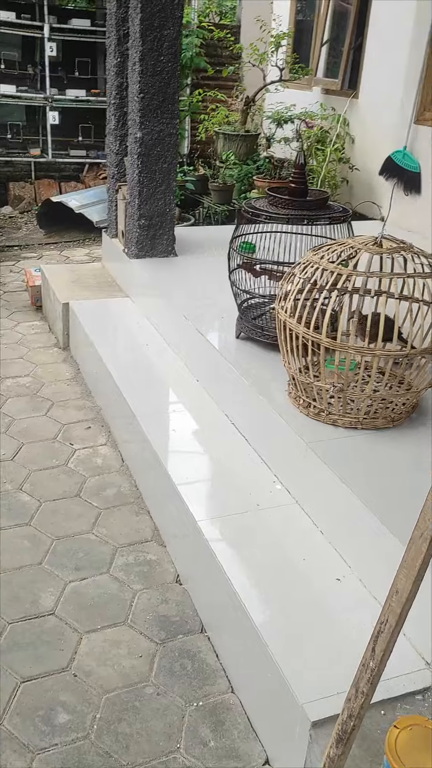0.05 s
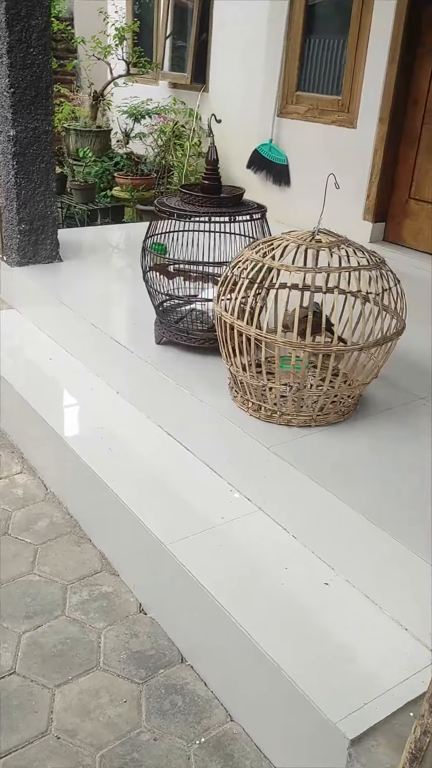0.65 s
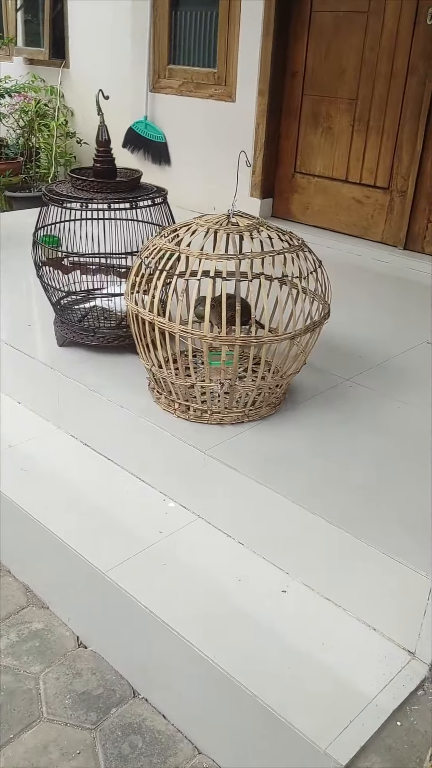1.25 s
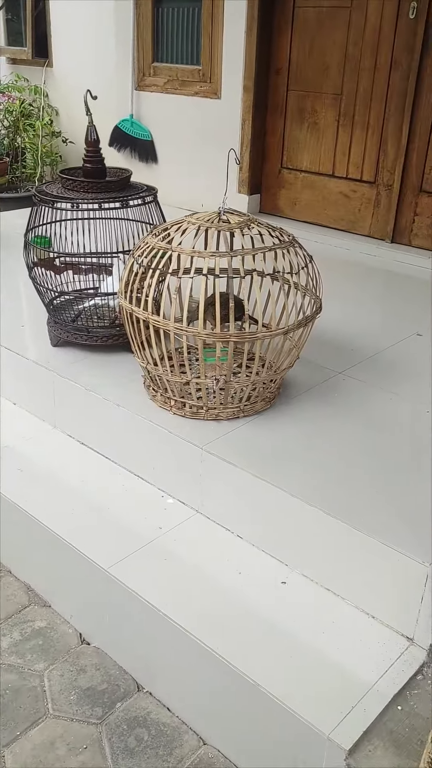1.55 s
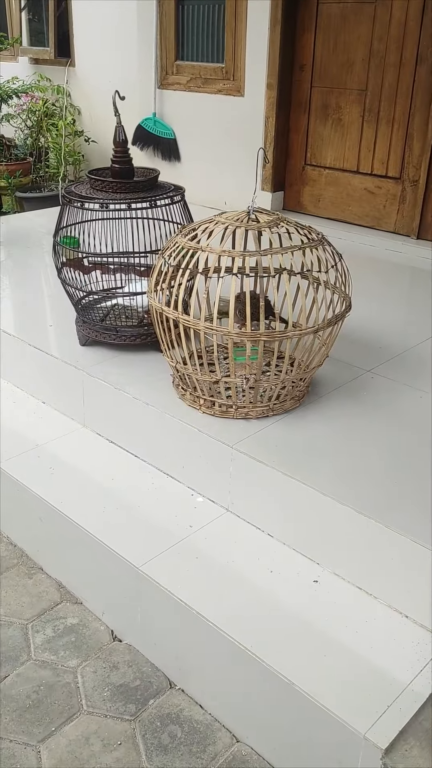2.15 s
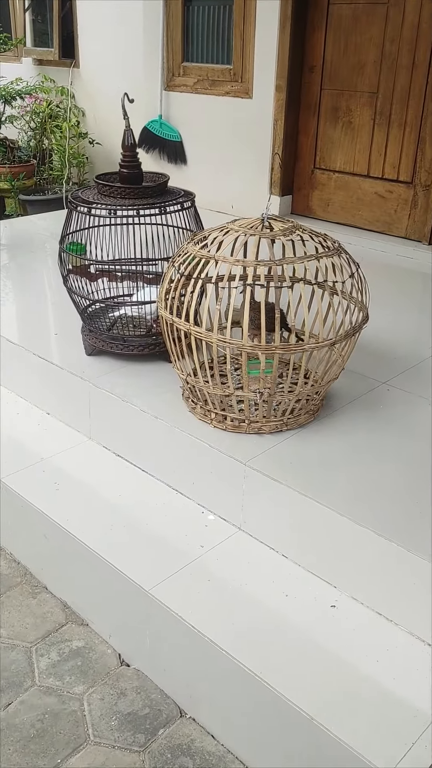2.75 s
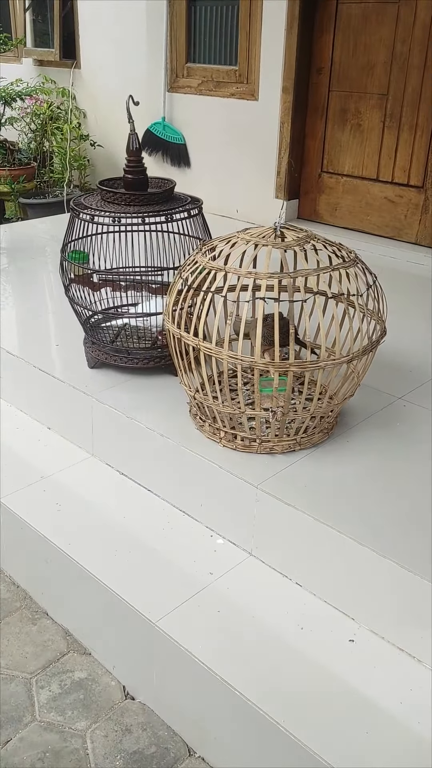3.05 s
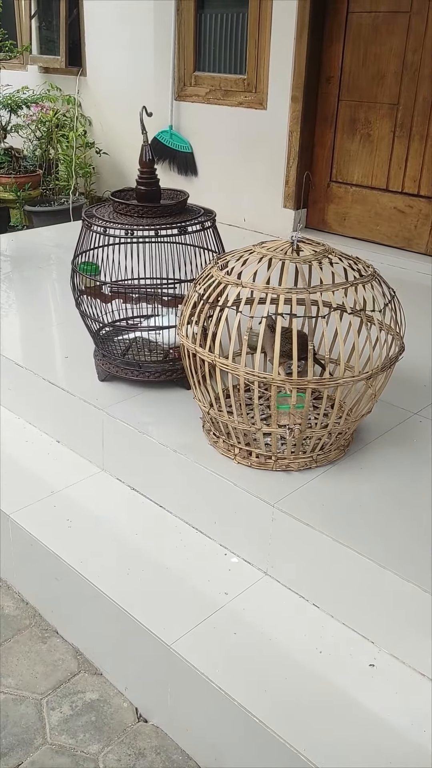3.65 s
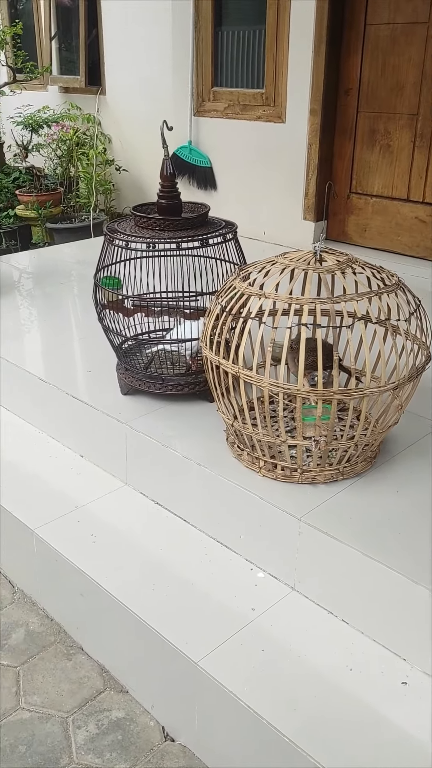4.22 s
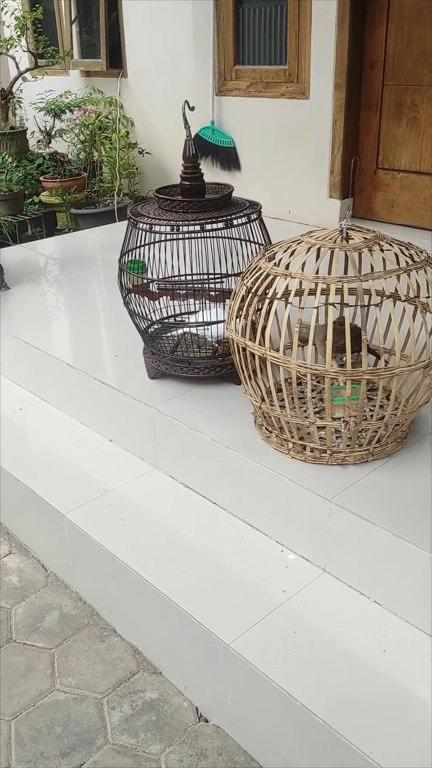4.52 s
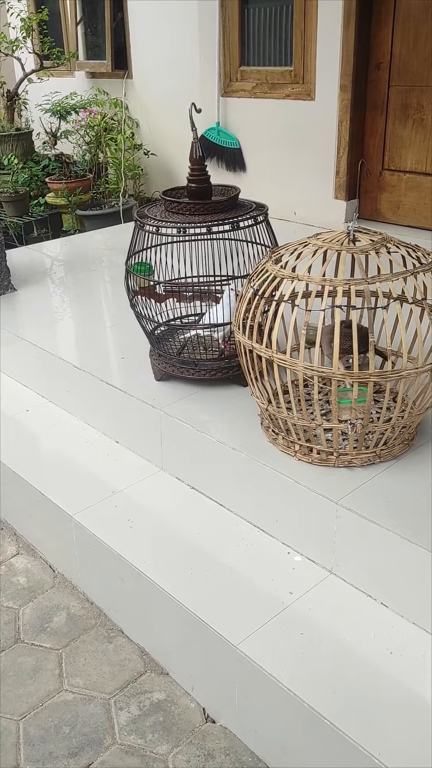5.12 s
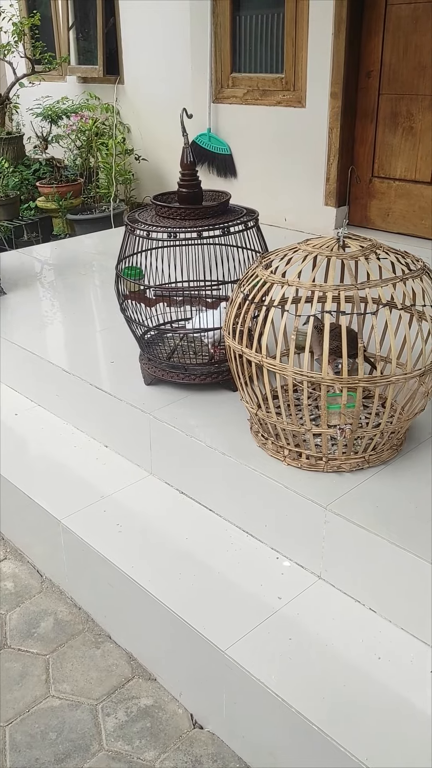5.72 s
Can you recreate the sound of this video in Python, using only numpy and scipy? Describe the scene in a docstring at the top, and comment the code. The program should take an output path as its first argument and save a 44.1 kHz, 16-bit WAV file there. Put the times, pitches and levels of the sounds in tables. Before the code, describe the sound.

A faint outdoor rumble, soft breeze and thin hiss run throughout on a tiled house porch, and a distant engine hums briefly in the first second. A caged dove, slightly left, is the loudest sound. Each coo is a short throbbing hoot followed by a longer low note that starts with a rolling burr, clears, lifts and falls, echoing lightly under the roof. The coos come at about 0.3 to 1.1 seconds, 1.5 to 2.3 and 2.8 to 3.5. Three close, dry taps land at 2.0, 2.1 and 2.4 seconds, the first two dull, the last sharper. Around 3.6 the dove adds a soft, hoarse rising note. Small, faint scratches and gritty scuffs run from about 3.5 to 5.1 seconds, with a brighter scuff near 5.0. A fourth coo follows from 5.1 to 5.8, with one more light scuff.

```python
"""Low rumble, breeze and thin hiss open on a tiled porch, and a far engine drones briefly. A caged dove
coos: a short throbbing hoot, then a long arched note whose rolling burr, a slow vibration beating against
the syrinx's tone, clears. Three close taps fall during and just after the second coo. The third is
followed by a soft, hoarse rising note and a run of small scratches and scuffs; then comes a fourth coo.
The dove's voice echoes off the tiles and rings under the roof."""
import sys
import numpy as np
from scipy import signal
from scipy.fft import rfft, irfft, next_fast_len
from scipy.io import wavfile
from scipy.ndimage import map_coordinates

SR = 44100
rng = np.random.default_rng(int(sys.argv[2]) if len(sys.argv) > 2 else 0)


def pcm_store(signal):
    """Save signal as 16-bit PCM."""
    levels = np.round(np.clip(np.atleast_2d(signal), -1, 1) * 32767)
    wavfile.write(sys.argv[1], SR, levels.astype(np.int16).T)


N = 254898

# EQ of the low rumble: freq_hz, gain_db
RUMBLE_EQ = [(12, -43), (20, -0.5), (48, -6.5), (80, -3.5), (140, -11), (160, -24), (210, -31), (350, -120)]
# swells of the rumble: peak_s, spread_s, level_db
RUMBLE_SWELLS = [(.33, 0.18, -62), (1.86, .14, -55.5), (3.2, 0.12, -61), (4.55, .07, -61)]
# EQ of the breeze: freq_hz, gain_db
BREEZE_EQ = [(70, -37), (140, 1), (210, 1.5), (300, -1), (450, -1.5), (750, -4.5), (1500, -8), (2200, -10),
             (3700, -19.5), (5000, -15.5), (7000, -40.5)]
# the breeze freshens: peak_s, spread_s, level_db
GUSTS = [(.45, 0.48, -54.5), (2.92, 0.23, -57)]
# EQ of the hiss at the left port: freq_hz, gain_db
HISS_LEFT_EQ = [(3000, -76), (4200, -58), (5200, -11.5), (6600, 0.5), (7800, 5.5), (8900, 10.5), (9500, 3),
                (10200, -11.5), (14000, -15), (15500, -23)]
# EQ of the hiss at the right port: freq_hz, gain_db
HISS_RIGHT_EQ = [(3000, -5.5), (4200, -10.5), (5200, -7.5), (6300, -4.5), (7600, 6.5), (8400, 0),
                 (9200, -25), (10200, -21), (14000, -22), (15500, -40)]
# partials of the far engine: pitch_hz, level_db
ENGINE_PARTIALS = [(105, -54), (141, -58.5), (175, -52), (208, -57.5)]
# the engine comes and goes: peak_s, spread_s, gain_db
ENGINE_SWELLS = [(.34, 0.14, -3), (1.17, 0.22, -14)]
# soft, narrow scratches: peak_s, spread_s, level_db, centre_hz
SCRATCHES = [(.25, 0.051, -57, 236), (2.02, 0.054, -51, 282), (3.53, .02, -62, 1757),
             (3.675, 0.046, -55.5, 1610), (3.765, 0.026, -59, 1600), (3.861, 0.015, -56, 1670),
             (3.965, 0.028, -57, 1630), (4.053, 0.022, -51.5, 2000), (4.197, .0095, -53, 1690),
             (4.6, 0.058, -58, 224), (4.91, 0.07, -60.5, 344), (5.015, 0.046, -58, 1170),
             (5.12, .0015, -44.5, 7600), (5.17, .12, -71, 1770)]
# scuffs and ticks: peak_s, rise_s, t60_s, body_db, bright_db, fizz_db, pan_left_db
SCUFFS = [(.463, .004, 0.13, -58, -57, -79, 0), (1.18, 0.023, .27, -62, -67, -79, 3),
          (1.975, 0.044, 0.14, -58.5, -57, -80, 9), (2.822, 0.0071, 0.43, -53, -51.5, -73, -2.5),
          (4.032, 0.0071, 0.17, -53, -47, -77, 3), (4.068, 0.013, 0.095, -52, -58, -74.5, 0),
          (4.587, .002, .033, -90, -58, -74, -3), (4.966, 0.0015, 0.097, -51, -38.5, -55, 3),
          (4.998, 0.013, 0.39, -60, -47.5, -64.5, -0.5), (5.634, 0.024, 0.31, -55.5, -46.5, -63.5, 0)]
# EQ of a scuff's dull body: freq_hz, gain_db
SCUFF_BODY_EQ = [(300, -11), (1000, -1), (2100, 3.5), (2700, 1), (3800, -4), (6000, -5), (9500, -52),
                 (11000, -38)]
# EQ of its bright edge: freq_hz, gain_db
SCUFF_BRIGHT_EQ = [(2500, -40), (5000, -6.5), (7500, 4.5), (9300, 4.5), (10300, -20), (14000, -37.5)]
# EQ of its fine fizz: freq_hz, gain_db
SCUFF_FIZZ_EQ = [(7000, -39), (11000, 5), (15000, -6.5), (16000, -26)]
# dry taps: start_s, gain_db, lowpass_hz, pan_left_db
TAPS = [(1.9775, -5, 950, 6), (2.121, -16, 700, 1), (2.4083, -1, 15000, 10)]
# EQ of a tap: freq_hz, gain_db
TAP_EQ = [(70, -5), (115, -23), (150, 7.5), (215, 10), (500, 7), (750, -0.5), (980, 5.5), (1500, -3),
          (2000, -3.5), (2600, -8), (4000, -12), (5400, -10), (6500, -27), (7900, -7), (8800, -0.5),
          (10500, -21), (15000, -50)]
# early reflections off tiles, wall and door: left_delay_s, right_delay_s, gain_db
REFLECTIONS = [(.0078, 0.00833, -13.5), (.0205, .0199, -34), (.037, .0378, -10)]
# decay of the porch reverb: freq_hz, t60_s
PORCH_DECAY = [(150, 0.82), (600, 0.36), (2000, 1), (10000, 0.19)]
# standing waves of the porch: centre_hz, width_hz, gain_db
PORCH_MODES = [(307, 15, 2), (564, 20, -3), (626.5, 25, -3.5)]
# EQ of the husk in the dove's voice: freq_hz, gain_db
HUSK_EQ = [(60, -71), (140, -31), (230, -6), (285, 1.5), (360, 0), (470, 3.5), (640, -3), (830, -4),
           (1200, -23), (4000, -51)]
# EQ of the swollen throat: freq_hz, gain_db
THROAT_EQ = [(150, -30), (280, -17), (370, -25), (440, -8), (510, -3), (570, -1.5), (635, -2), (690, 2),
             (735, -11), (850, -19), (1500, -46.5)]
# the hoot that opens each coo: start_s, swell_s, level_db, top_hz, roughness, irregularity
SHORT_NOTES = [(.337, 0.045, -33, 563, 0.76, 0.28), (1.533, 0.0702, -32.5, 547.5, 1.55, 0.38),
               (2.764, 0.0449, -35, 552, 1, .55), (5.137, 0.037, -32.5, 558.5, 0.92, 1)]
# the arched note of each coo (lift, fall and clear count from its start): start_s, length_s, scoop_s,
# held_db, held_hz, lift_s, crest_db, crest_hz, fall_s, falling_db, clear_s, opening_roughness, husk_db
LONG_NOTES = [(.572, 0.47, 0.026, -27, 575.2, .23, -33, 637.5, 0.32, -31.5, 0.073, 0.84, -19),
              (1.778, .45, 0.0301, -27, 584.4, .165, -29.5, 643.8, .336, -33.5, .17, 0.7, -14.5),
              (3.004, .458, .07, -26, 626.2, 0.203, -32, 648.4, .305, -32, 0.14, 1.57, -25),
              (5.384, 0.42, 0.031, -27.5, 585.6, .228, -31.5, 635.9, 0.31, -28, 0.23, 0.87, -15)]
# the coo's loudness briefly peaks or dips: centre_s, spread_s, gain_db
PEAKS_AND_DIPS = [(.39, .015, 0), (.775, 0.0099, -4.5), (0.801, 0.0032, -19), (.814, 0.0041, 4.5),
                  (0.867, 0.0063, 5.5), (.92, 0.011, 5), (1.04, 0.0088, 3), (1.567, 0.009, -4.5),
                  (1.605, 0.013, 2), (1.72, 0.056, -6), (2.004, 0.0062, -8.5), (2.02, .008, 5),
                  (2.092, 0.0075, 2.5), (2.15, 0.015, -4), (2.806, 0.0035, -19), (2.822, 0.0068, 4.5),
                  (3.119, 0.0023, -10), (3.151, 0.0059, -16.5), (3.181, 0.0089, 0), (3.207, 0.0035, -17),
                  (3.305, 0.014, 4), (3.452, 0.0072, 6), (5.565, 0.0073, -11.5)]

TIME = np.arange(N) / SR


def amp(db):
    """Decibels to gain."""
    return 10 ** (np.asarray(db) / 20)


def unit(x):
    """x at rms 1."""
    return x / np.sqrt(np.mean(np.abs(x) ** 2) + 1e-20)


def along(points, hz):
    """A (freq_hz, value) curve read on a log frequency axis."""
    freqs, values = np.transpose(points)
    return np.interp(np.log(hz + 1), np.log(freqs + 1), values)


def wobble(rate):
    """A smooth random modulator, rate knots a second."""
    return map_coordinates(rng.standard_normal(int(N * rate / SR) + 4), [np.arange(N) * rate / SR])


def phase(hz):
    """Phase of a gliding oscillator."""
    return 2 * np.pi * np.cumsum(hz) / SR


def filtered(x, response):
    """x through a frequency response."""
    size = next_fast_len(N + SR // 2)
    return irfft(rfft(x, size) * response(np.fft.rfftfreq(size, 1 / SR)), size)[..., :N]


def eq(x, curve):
    """x through a (freq_hz, gain_db) curve."""
    return filtered(x, lambda hz: amp(along(curve, hz)))


def causal(gain):
    """The response with this gain that rings only after it is struck."""
    cepstrum = irfft(np.log(gain))
    half = len(cepstrum) // 2
    return np.exp(rfft(np.concatenate([cepstrum[:1], 2 * cepstrum[1:half], np.zeros(half)])))


def pan(left_db):
    """Channel gains that put the left this far above the right."""
    return amp([[left_db / 2], [-left_db / 2]])


def stereo_noise(shared):
    """White noise with this share of its power common to both channels."""
    return np.sqrt(shared) * rng.standard_normal(N) + np.sqrt(1 - shared) * rng.standard_normal((2, N))


def step(x):
    """A smooth step from 0 to 1 around x = 0."""
    return (1 + np.tanh(x / 2)) / 2


def envelope(age, attack_s, hold_s, release_s):
    """Rises over the attack, stays until hold_s, then loses 20 dB in each release time."""
    return np.clip(age / attack_s, 0, 1) * 10 ** (-np.maximum(age - hold_s, 0) / release_s)


def bell(peak_s, spread_s):
    """A bell-shaped bump in time."""
    return np.exp(-((TIME - peak_s) / spread_s) ** 2 / 2)


def swells(rows):
    """Gain of a series of bell-shaped swells."""
    return sum(amp(db) * bell(peak_s, spread_s) for peak_s, spread_s, db in rows)


def rumble(floor_db=-62):
    """A lumpy low end that swells now and then."""
    lumps = amp(1.4 * wobble(9))
    bed = unit(eq(stereo_noise(0.71), RUMBLE_EQ) * lumps)
    return np.hypot(amp(floor_db), swells(RUMBLE_SWELLS)) * bed * pan(3.5)


def breeze(floor_db=-57, wide_above_hz=550):
    """Soft moving air with two gusts; both sides share the bass but have unrelated treble."""
    centre, sides = eq(rng.standard_normal(N), BREEZE_EQ), eq(rng.standard_normal((2, N)), BREEZE_EQ)
    shared = lambda hz: 1 / (1 + (hz / wide_above_hz) ** 2)
    centre = filtered(centre, lambda hz: np.sqrt(shared(hz)))
    sides = filtered(sides, lambda hz: np.sqrt(1 - shared(hz)))
    air = unit((centre + sides) * amp(1.74 * wobble(9)))
    return np.hypot(amp(floor_db), swells(GUSTS)) * air * pan(5.5)


def hiss(level_db=-54.5, fade_db_per_s=0.83):
    """A slowly thinning hiss that each microphone port colours in its own way."""
    left, right = stereo_noise(0.85)
    ports = np.array([unit(eq(left, HISS_LEFT_EQ)), unit(eq(right, HISS_RIGHT_EQ))])
    return amp(level_db - fade_db_per_s * TIME + 0.22 * wobble(11)) * ports * pan(-3.5)


def ambience(fade_in_s=0.14, from_db=-11.5):
    """The outdoor bed: breeze and hiss fade in over the rumble."""
    fade_in = 1 - np.exp(-TIME / fade_in_s) * (1 - amp(from_db))
    return rumble() + fade_in * (breeze() + hiss())


def far_engine():
    """A far engine hums and fades, its partials drifting together with its speed."""
    speed = 1 + 0.017 * wobble(7.3)
    hum = sum(amp(db + 2 * wobble(8)) * np.sin(phase(hz * speed)) for hz, db in ENGINE_PARTIALS)
    return np.sqrt(2) * hum * swells(ENGINE_SWELLS) * pan(4)


def scratches(grain_db=1.5, q=6.7):
    """Faint, grainy strokes, each through one resonance."""
    out, noise, grit = np.zeros((2, N)), stereo_noise(0.3), amp(grain_db * wobble(300))
    for peak_s, spread_s, db, centre_hz in SCRATCHES:
        band = filtered(noise, lambda hz: 1 / (1 + (q / 2 * (hz / centre_hz - centre_hz / (hz + 1))) ** 2))
        out += amp(db) * bell(peak_s, spread_s) * unit(band * grit)
    return out * pan(0.5)


def scuffs(grain_db=2.5, rustle_db=-75, rustle_swing_db=5.5):
    """Gritty rubs whose body, edge and fizz swell and die together, with faint rustles between them."""
    grit = amp(grain_db * wobble(500))
    curves = SCUFF_BODY_EQ, SCUFF_BRIGHT_EQ, SCUFF_FIZZ_EQ
    body, bright, fizz = (unit(grit * eq(stereo_noise(0.53), curve)) for curve in curves)
    out = amp(rustle_db + rustle_swing_db * np.clip(wobble(17), -2, 2)) * (body + 2 * bright)
    for peak_s, rise_s, t60_s, body_db, bright_db, fizz_db, left_db in SCUFFS:
        age = TIME - peak_s
        shape = np.exp(np.minimum(age, 0) / rise_s) * amp(-60 * np.maximum(age, 0) / t60_s)
        rub = amp(body_db) * body + amp(bright_db) * bright + amp(fizz_db) * fizz
        out += shape * rub * pan(left_db)
    return out


def taps(lag_cycles=1.2):
    """Sharp blows whose bass arrives last, so each falls from click to thud; soft taps are duller."""
    hz, out = np.fft.rfftfreq(SR // 2, 1 / SR), np.zeros((2, N))
    bass_lag = np.exp(-2j * np.pi * lag_cycles * np.log(hz + 10))
    for start_s, db, lowpass_hz, left_db in TAPS:
        spectrum = amp(along(TAP_EQ, hz)) / np.hypot(1, (hz / lowpass_hz) ** 2)
        blow = irfft(causal(spectrum) * bass_lag)[:SR // 4]
        out += amp(db) * pan(left_db) * np.pad(blow, (round(start_s * SR), N))[:N]
    return out


def walls(x):
    """The direct sound and its early reflections, which beat against a gliding note."""
    delayed = lambda s: np.pad(x, (round(s * SR), 0))[:N]
    return x + sum(amp(db) * np.array([delayed(left), delayed(right)]) for left, right, db in REFLECTIONS)


def porch_reverb(x, predelay_samples=600):
    """The diffuse tail under the porch roof, strongest at its standing waves."""
    def modes(hz):
        return sum(amp(db) * 1j * hz * width / (centre ** 2 - hz ** 2 + 1j * hz * width)
                   for centre, width, db in PORCH_MODES)
    send = np.pad(amp(-4.5) * x + filtered(x, modes), (predelay_samples, 0))
    hz, t, noise = signal.stft(rng.standard_normal((2, SR // 2)), SR, nperseg=256)
    tail = signal.istft(noise * amp(-60 * t / along(PORCH_DECAY, hz)[:, None]), SR, nperseg=256)[1]
    return signal.fftconvolve(send[None], tail / np.linalg.norm(tail[0]), axes=1)[:, :N]


def syrinx(pitch, rough, burr_hz, drift, burr, roll, rattle, buzz):
    """A pure tone; when rough, a slower vibration beats against it and throws sidebands."""
    beat = phase(burr_hz * (1 + drift * wobble(25)))
    shake = burr * np.exp(1j * beat)  # one sideband, below the tone if burr_hz is negative
    shake += roll * np.cos(beat / 2) + buzz * np.cos(2 * beat)
    shake += rattle * (wobble(170) + 1j * wobble(170))
    shake_power = burr ** 2 + (roll ** 2 + buzz ** 2) / 2 + 2 * rattle ** 2
    modulation = (1 + rough * shake) / np.sqrt(1 + rough ** 2 * shake_power)
    carrier = np.exp(1j * phase(pitch * (1 + 0.008 * wobble(60))))
    return np.sqrt(2) * np.real(modulation * carrier)


def hoarse_note(start_s=3.635, hold_s=0.34, level_db=-45.5, start_hz=423.6, top_hz=594.5):
    """A soft rising note that starts nearly clean and breaks up into husk and a sub-octave."""
    age = np.maximum(TIME - start_s, 0)
    pitch = np.minimum(start_hz + 600 * age, top_hz)
    rough = 0.067 + 5.8 * np.minimum(age, hold_s)
    tone = syrinx(pitch, rough, burr_hz=-118, drift=0.04, burr=0.8, roll=0.3, rattle=0.4, buzz=0)
    sub = np.sin(phase(pitch / 2 * (1 + 0.04 * wobble(60)))) * amp(3 * wobble(40))
    husk = unit(eq(rng.standard_normal(N), HUSK_EQ)) * np.sqrt(rough)
    voice = amp(-1) * tone * np.sqrt(1 - rough / 4) + amp(-11) * husk + amp(-19) * sub * rough
    return amp(level_db) * voice * envelope(age, attack_s=0.06, hold_s=hold_s, release_s=0.2)


def short_note(age, swell_s, db, top_hz, rough, irregular):
    """Voice controls for a brief throbbing hoot whose pitch peaks early, then sags."""
    top_s, release_s, husk_db = 0.04, 0.12, -18.5
    scoop_hz_per_s, sag_hz_per_s = 1232, 560
    early, late = np.clip(top_s - age, 0, top_s), np.clip(age - swell_s, 0, release_s)
    pitch = top_hz - scoop_hz_per_s * early - sag_hz_per_s * late
    level = amp(db) * envelope(age, swell_s, swell_s + 0.012, release_s)
    return pitch, rough, irregular, level, husk_db


def long_note(age, length_s, scoop_s, held_db, held_hz, lift_s, crest_db, crest_hz,
              fall_s, falling_db, clear_s, opening_rough, husk_db):
    """Voice controls for the arch: a burr that clears, a jump to a crest, a fall as the air runs out."""
    start_hz, end_hz, sag_hz_per_s, settle_s = 475, 536, 160, 0.04
    clear_rough, end_rough, irregular = 0.075, 0.28, 1
    scoop_dip_db, burr_dip_db, fade_db_per_s = 1.5, 7.5, 70
    scooping, burring = np.exp(-age / scoop_s), step((clear_s - age) / 0.023)
    lifted, fallen = step((age - lift_s) / 0.005), step((age - fall_s) / 0.0072)
    crest_age = np.clip(age, lift_s, fall_s) - lift_s
    fall_age = np.maximum(np.minimum(age, length_s) - fall_s, 0)
    arch = held_hz + (start_hz - held_hz) * scooping
    arch += (crest_hz - held_hz) * lifted - sag_hz_per_s * crest_age
    pitch = end_hz + (arch - end_hz) * np.exp(-fall_age / settle_s)
    rough = clear_rough + (opening_rough - clear_rough) * burring * (1 - scooping)
    rough += (end_rough - clear_rough) * fallen
    effort_db = held_db + (crest_db - held_db) * lifted + (falling_db - crest_db) * fallen
    loss_db = scoop_dip_db * scooping + burr_dip_db * burring + fade_db_per_s * fall_age
    level = amp(effort_db - loss_db) * envelope(age, attack_s=0.024, hold_s=length_s, release_s=0.036)
    return pitch, rough, irregular, level, husk_db


def phrasing():
    """Each note takes over the five voice controls in turn; a sixth is 1 during short notes."""
    controls = np.zeros((6, N))
    notes = [(row, short_note) for row in SHORT_NOTES] + [(row, long_note) for row in LONG_NOTES]
    for (start_s, *shape), note in sorted(notes, key=lambda entry: entry[0][0]):
        age = np.maximum(TIME - start_s, 0)
        played = np.broadcast_arrays(*note(age, *shape), note is short_note)
        controls = np.where(TIME >= start_s, played, controls)
    return controls


def coos(short_burr_hz=77, long_burr_hz=112, usual_hz=535, trim_db=-0.6, overtone_db=-40):
    """Short and long notes alternate; the swollen throat passes little but fundamental and low husk."""
    pitch, rough, irregular, level, husk_db, is_short = phrasing()
    slowing_hz = 0.4006 * (pitch - usual_hz)  # the beat slows as the pitch climbs
    burr_hz = np.where(is_short, short_burr_hz, long_burr_hz) - slowing_hz
    tone = syrinx(pitch, rough, burr_hz, drift=0.13, burr=0.62,
                  roll=0.58 * irregular, rattle=0.44 * irregular, buzz=0.55 * irregular)
    peaks_and_dips_db = sum(db * bell(centre_s, spread_s) for centre_s, spread_s, db in PEAKS_AND_DIPS)
    flutter = amp(1.5 * wobble(60) + peaks_and_dips_db)
    husk = amp(husk_db) * np.sqrt(np.abs(rough)) * unit(eq(rng.standard_normal(N), HUSK_EQ))
    overtone = amp(overtone_db) * (tone ** 2 - 1)
    return amp(trim_db) * (eq(level * flutter * tone, THROAT_EQ) + level * (overtone + husk))


def scene():
    """The dove a little left in the porch reverb, with dry close-up sounds and the outdoor bed."""
    dove = coos() + hoarse_note()
    dove_on_porch = (walls(dove) + amp(-3) * porch_reverb(dove)) * pan(3.5)
    return dove_on_porch + taps() + scuffs() + scratches() + far_engine() + ambience()


def record(dry):
    """A brick-wall low-pass trims the very top of the mix."""
    return filtered(dry, lambda hz: hz < 15200)


dry = scene()
out = record(dry)
pcm_store(out)
```